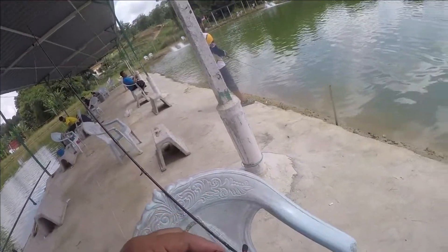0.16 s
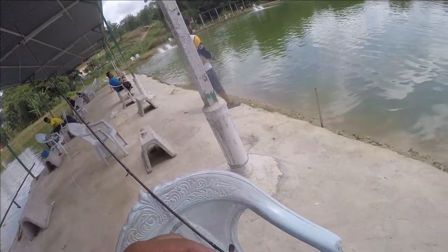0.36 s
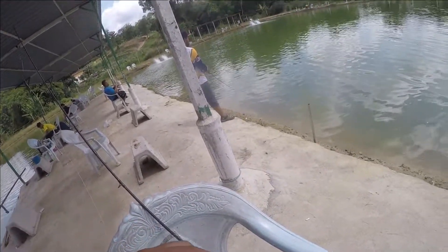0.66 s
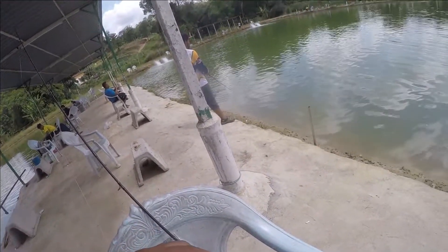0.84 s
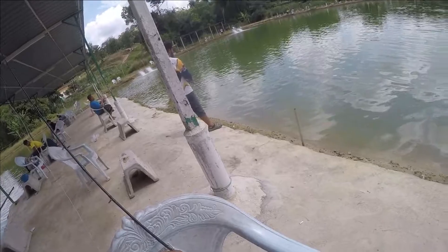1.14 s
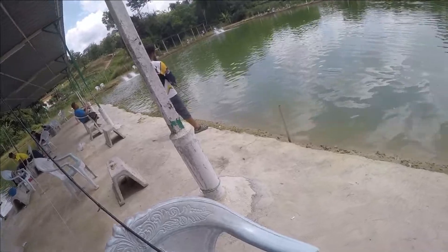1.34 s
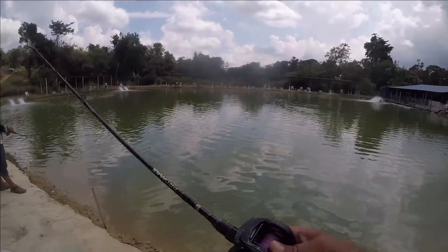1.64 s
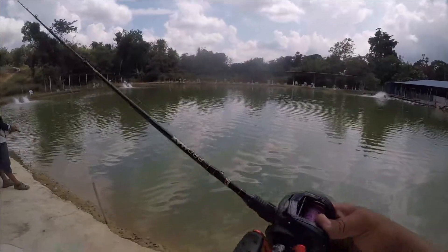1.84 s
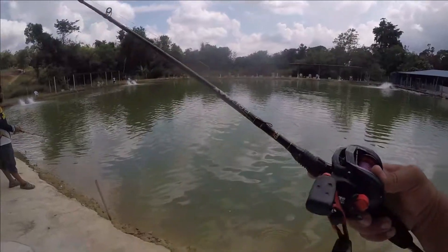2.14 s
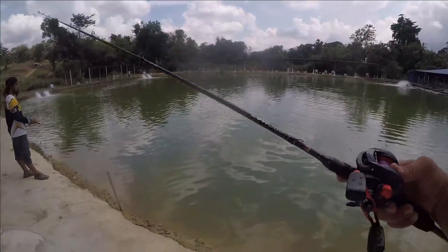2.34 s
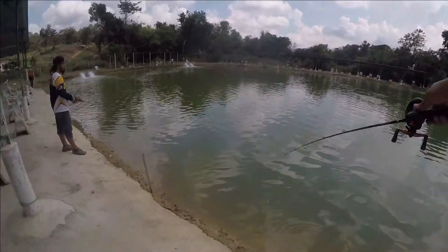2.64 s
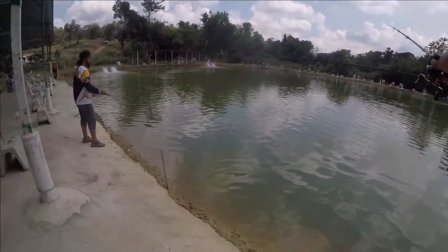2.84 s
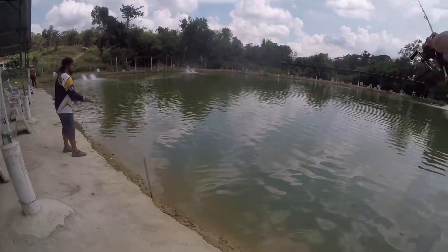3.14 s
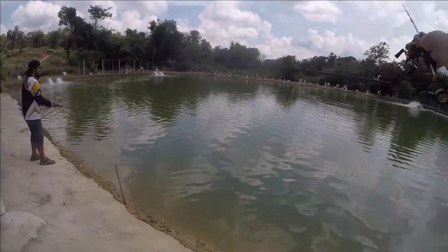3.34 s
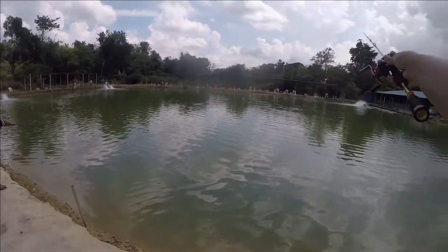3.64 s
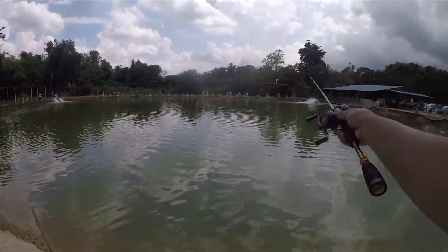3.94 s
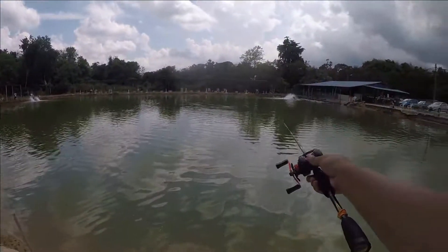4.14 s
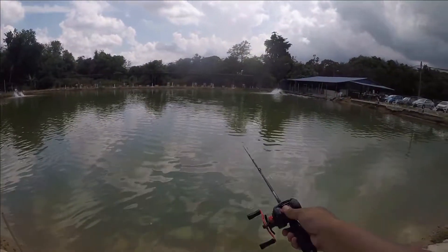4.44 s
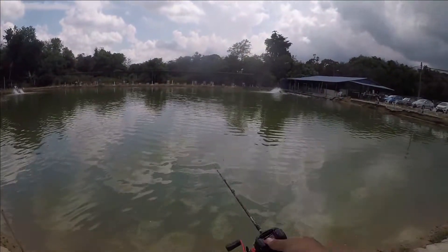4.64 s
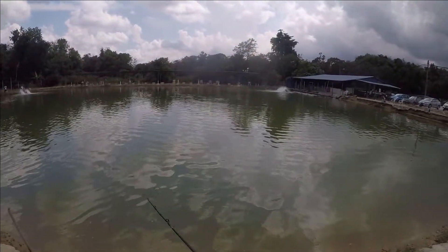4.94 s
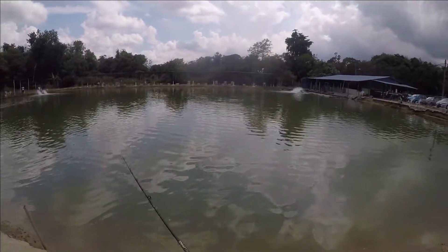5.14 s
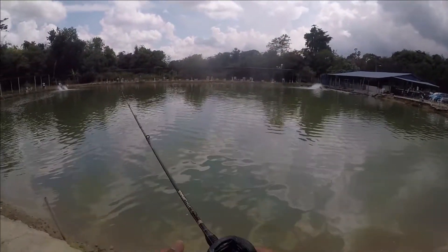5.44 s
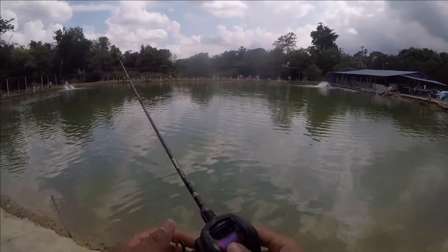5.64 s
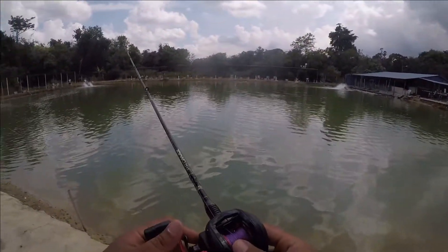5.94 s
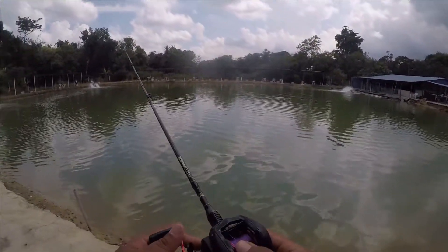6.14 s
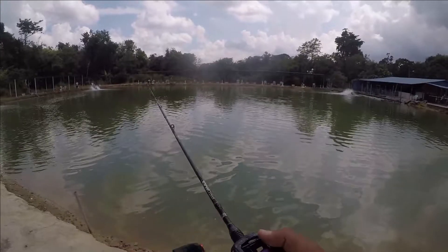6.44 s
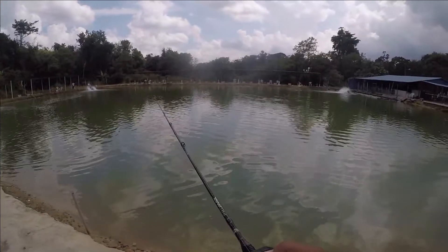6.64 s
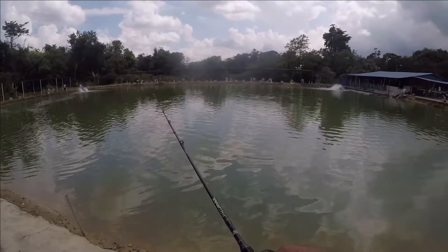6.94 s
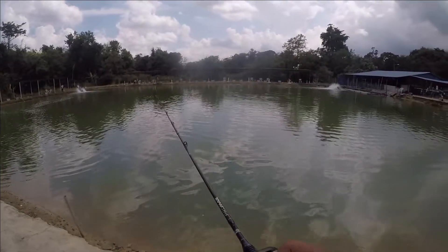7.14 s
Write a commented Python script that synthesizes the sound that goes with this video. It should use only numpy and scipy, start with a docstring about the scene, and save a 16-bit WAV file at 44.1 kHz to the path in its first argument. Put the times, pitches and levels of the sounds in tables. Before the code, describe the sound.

A continuous motor hum and churning water fill the background, with wind buffeting the microphone. After about a second and a half the sound cuts to another spot by the water and the hum drops in pitch. Someone close casts a fishing rod: fabric swish, low knock, bright click, thin fading hiss. Then handling sounds return, with scuffs, soft thumps and a rapid metallic rattle of the reel. Aerators keep droning throughout, slightly unsteady, with a second higher motor joining late.

```python
"""Electric motors drone over churning water: paddlewheel aerators on a pond, heard from two spots in turn.
Motors are sines on orders of a shaft beat; churn, spray, splashes and wind are coloured noise.
A hand casts a rod: cloth noise swells and crackles, clicks ring the reel, line hisses off the spool.
Short low thumps are damped sines; a faint tick marks the change of spot.
Two ports pick up the pond; gain control and soft peaks follow."""
import sys
import numpy as np
from scipy import signal
from scipy.fft import rfft, irfft, next_fast_len
from scipy.io import wavfile

SR = 44100
rng = np.random.default_rng(int(sys.argv[2]) if len(sys.argv) > 2 else 0)


def transcribe(u):
    """Save the signal u as a 16-bit wav file named by the first command-line argument.

    u: samples, shape (n,) or (channels, n), limited to [-1, 1]; the rate is SR.
    q: integer samples, one column per channel.
    """
    v = np.clip(np.atleast_2d(u).T, -1, 1)
    q = np.round(v * 32767).astype(np.int16)
    wavfile.write(sys.argv[1], SR, q)


N = 321489

MOVE_S = 1.428  # the listening spot changes
# faint tick at the change of spot; the corner frequency sets how fast it dies away
TICK_S, TICK_DB, TICK_CORNER_HZ = 1.4262, -17, 250

# main motor, first spot: (time [s], beat [Hz], level [dB])
MAIN_FIRST = [(0, 71.4, -18.5)]
# main motor, second spot: (time [s], level [dB])
MAIN_SECOND = [(1.44, -20.5), (2.0, -20.5), (2.6, -17), (3.1, -20.5), (4.0, -18), (4.7, -18.5),
               (5.8, -21.5), (6.5, -26), (7.0, -21), (7.29, -26)]
# upper orders of the main motor, stronger once the port faces the pond: (time [s], level [dB])
UPPER_SECOND = [(1.44, -64), (3.7, -34), (4.3, -30.5), (4.95, -33.5), (5.4, -31), (7.29, -35.5)]
# beat of the main motor at the second spot, sagging steadily
SECOND_BEAT_HZ, SAG_HZ_PER_S = 57.27, .72
# second motor, at each spot: (time [s], beat [Hz], level [dB])
OTHER_FIRST = [(0, 94.26, -28.5), (.7, 94, -20.5)]
OTHER_SECOND = [(5.5, 92, -51), (5.9, 94, -19), (7.0, 100.5, -23.5), (7.29, 101, -36)]
# shaft orders: (multiple of beat [-], relative level [dB])
ORDERS_FIRST = [(1, -3), (1.75, -12), (2, 0), (2.25, -15), (2.5, -10), (3, -11)]
ORDERS_SECOND = [(1, -1), (2, 0), (3, -4), (4, -17)]
ORDERS_UPPER = [(6, 2), (8, -3), (9, -5), (10, -3)]
ORDERS_OTHER = [(1, 0), (1.2, -2), (2, -8), (2.5, -11), (4, -19)]
# gearbox tones: (frequency [Hz], level [dB])
GEAR_TONES = [(473, -34), (632, -35)]

# cloth and arm events, all with the same slopes: (peak time [s], scuff level [dB], swish level [dB])
RUSTLE = [(2.55, -51, -55), (2.68, -34, -33), (2.75, -36, -37.5), (5.2, -36, -46), (5.44, -54, -56),
          (5.58, -44, -40), (5.68, -36, -36.5), (6.2, -55, -38), (6.55, -48, -45)]
RUSTLE_RISE_DB_PER_S, RUSTLE_FALL_DB_PER_S = 77, 89
# scuff and swish spectra: (frequency [Hz], relative density [dB per Hz])
SCUFF = [(700, -11), (1000, 3), (1500, -2), (2100, -12), (2700, -34)]
CLOTH = [(300, -18), (600, -18), (1000, 13), (1700, 6), (2800, -1), (4500, -14), (8000, -19)]
# snapping folds of cloth: rate, level against the swish
CRACKLES_PER_S, CRACKLE_DB = 300, -14
# line off the spool around the release
HISS_PEAK_S, HISS_DB, HISS_RISE_DB_PER_S, HISS_FALL_DB_PER_S = 2.93, -48, 70, 22
# line hiss spectrum: (frequency [Hz], relative density [dB per Hz])
SPOOL = [(6000, -16), (8000, 12), (10500, -1), (13000, -12), (15300, -20)]
# rod and reel clicks: (time [s], strength [dB], loudest pitch [Hz], fall away from it [dB per octave],
# left minus right [dB])
CLICKS = [(2.732, -20, 2900, 16, -3), (2.9388, -22, 2000, 8, 6), (2.939, -7, 11600, 47, 10),
          (2.9415, -26, 11000, 20, 4), (2.947, -19, 10300, 40, 0), (2.955, -26, 8000, 24, 0),
          (5.43, -17, 1550, 30, 4), (5.886, -33, 9000, 6, 3), (6.0525, -13, 1350, 17, 8),
          (6.058, -8, 2300, 22, 4), (6.0582, -14, 6000, 34, 0), (6.0885, -24, 8000, 30, 2),
          (6.091, -11, 7950, 26, -16), (6.0913, -14, 3360, 12, 6), (6.0941, -7, 1720, 10, 4),
          (6.0955, -22, 8000, 20, 0), (6.098, -9.5, 2700, 2, 7), (6.0981, -11, 8400, 29, -4),
          (6.0996, -4, 4560, 16, -7), (6.111, -30, 5000, 12, 0), (6.5236, -12.5, 3300, 33, 4),
          (6.5236, -19, 1850, 40, 6), (6.529, -25, 3956, 24, 4)]
# reel modes: (frequency [Hz], relative level [dB], t60 [s])
REEL_MODES = [(1250, -8, .014), (1540, -1, .016), (1815, -1, .014), (2335, 0, .012), (2900, -1, .012),
              (3500, -7, .008), (3950, -4, .008), (4540, -2, .008), (5120, -6, .007), (6000, -7, .006),
              (7350, -4, .006), (8100, -3, .007), (9150, -1, .007), (10800, -4, .005), (12000, -6, .004),
              (13500, -9, .003), (15200, -17, .003)]
REEL_SOFT_HZ = 13500  # soft contacts dull the clicks above this
# short low thumps: (time [s], strength [dB], loudest pitch [Hz], fall away from it [dB per octave])
THUMPS = [(1.428, -8, 485, 29), (1.442, -12.5, 486, 30), (2.6981, -0.5, 166, 16), (2.742, -7, 575, 44),
          (4.294, -9.5, 485, 40), (5.43, -12.5, 1150, 27), (6.545, -8, 573, 38), (7.161, -7.5, 485, 45)]
# hollow notes of the thumps: (frequency [Hz], t60 [s], left minus right [dB])
THUMP_NOTES = [(118, 0.079, -4), (191, 0.077, -3.5), (295, 0.079, -8), (485, 0.049, -10), (620, 0.044, -7),
               (1160, .026, 3)]
OPPOSITE_PHASE_HZ = 540  # thump notes above this are in opposite phase on the right

# far water: (time [s], churn level [dB], spray level [dB])
WATER = [(0, -19.5, -47.5), (.75, -18.5, -44.5), (1.4, -19, -46.5), (1.5, -18, -46), (2.6, -17, -45),
         (3.5, -19, -47.5), (4.3, -16.5, -45.5), (5.6, -16, -44.5), (7.15, -17, -46), (7.29, -19, -49)]
# churn, splash and spray spectra: (frequency [Hz], relative density [dB per Hz])
CHURN = [(70, -3.5), (130, -4), (200, -8.5), (300, -8), (400, -7.5), (530, -3), (640, -6), (750, -13),
         (1000, -22), (1300, -29.5), (1700, -35.5), (2400, -38.5), (3500, -43.5), (5000, -50.5)]
SPLASH = [(1000, -8), (1300, -4), (1500, -20.5), (1700, 4), (1900, -12), (2450, -7), (3300, -9),
          (4200, -25)]
SPRAY_FIRST = [(3500, -16), (5500, -7.5), (7300, -1), (8300, -3), (9200, -2), (10200, -8), (12000, -21),
               (13500, -23), (14400, -45)]
SPRAY_SECOND = [(3500, -8), (5500, -5), (7300, 3.5), (8300, -1.5), (9200, -2.5), (10200, -5.5),
                (12000, -15.5), (13500, -23), (14400, -45)]
SPLASH_DB = -31  # against the churn
# rough boom under the roof, first spot: (frequency [Hz], relative density [dB per Hz])
SHELTER = [(60, -11), (100, -8.5), (160, -0.5), (250, -3.5), (320, -10), (700, -34), (1000, -17.5),
           (1300, -41)]
SHELTER_DB = -23

# wind on the ports: (time [s], level [dB])
WIND = [(0, -24), (1.0, -21), (1.75, -18), (2.5, -19), (3.37, -10.5), (3.46, -20), (4.2, -27), (5.0, -17.5),
        (5.9, -20), (6.5, -14), (6.94, -17.5), (7.29, -14.5)]
# single buffets, all with the same slopes: (peak time [s], peak level [dB])
BUFFETS = [(.47, -14), (.89, -16), (4.63, -24), (5.09, -22), (5.52, -12.5), (5.74, -14.5), (7.07, -17)]
BUFFET_RISE_DB_PER_S, BUFFET_FALL_DB_PER_S = 108, 77
# wind spectrum: (frequency [Hz], relative density [dB per Hz])
RUMBLE = [(10, -24), (20, 0), (35, 0), (60, -4.5), (90, -7), (160, -21.5)]

# left port against the right, which booms near 550 Hz:
# (frequency [Hz], left minus right [dB], likeness [0-1], lead [rad])
PORTS = [(70, -1, 1, -.1), (200, -3, .98, -.22), (400, -8, .97, -.22), (500, -14, .78, .1),
         (600, -18, .6, 1.5), (700, -15, .85, 2.2), (1050, -3, .8, 2.15), (1300, 1, .4, 2.3),
         (1600, 2, .45, .3), (2400, 0, .15, 0), (4000, -.5, .85, 0), (5000, 1, 0, 0), (6500, -2, .55, 3.1),
         (9000, -2.5, .45, 2.0), (13000, 0, .3, 1.5)]
CUTOFF_HZ = 16100


def aerators():
    """Motors and gears as the right port hears them: harmonic drones of turning shafts."""
    later = second_spot()
    first = motor(MAIN_FIRST, ORDERS_FIRST, waver_db=1.0)
    first += motor(OTHER_FIRST, ORDERS_OTHER, waver_db=3.0)
    second = motor(sagging(MAIN_SECOND), ORDERS_SECOND, waver_db=1.0)
    second += motor(OTHER_SECOND, ORDERS_OTHER[:1], waver_db=2.0)
    second += motor(sagging(UPPER_SECOND), ORDERS_UPPER, waver_db=1.5)
    gears = sum(motor([(0, hz, db)], ORDERS_OTHER[:1], waver_db=2.5) for hz, db in GEAR_TONES)
    return first * (1 - later) + second * later + gears


def motor(curve, orders, waver_db):
    """Sines on orders of the beat; the air over the pond makes each waver on its own."""
    beat_hz, level_db = in_time(curve)
    unsteady_hz = beat_hz * (1 + 0.00186 * drift(3.03))
    turn_rad = 2 * np.pi * np.cumsum(unsteady_hz) / SR
    lines = np.zeros(N)
    for multiple, order_db in orders:
        gain = from_db(order_db + waver_db * drift(6.5))
        lines += gain * np.sin(multiple * turn_rad + rng.uniform(0, 2 * np.pi))
    return np.sqrt(2) * from_db(level_db) * lines


def sagging(levels):
    """Adds the slowing beat of the second spot to a level curve, held to the end."""
    held = [*levels, (N / SR, levels[-1][1])]
    return [(s, SECOND_BEAT_HZ - SAG_HZ_PER_S * (s - MOVE_S), db) for s, db in held]


def handling():
    """Close sounds of the cast, each reaching both ports directly."""
    return rustle() + line_hiss() + reel()


def rustle():
    """Cloth friction: scuffs in opposite phase at the ports, swishes with crackle; stronger on the left."""
    peak_s, scuff_db, swish_db = np.transpose(RUSTLE)
    slopes = RUSTLE_RISE_DB_PER_S, RUSTLE_FALL_DB_PER_S
    scuff = swells(peak_s, scuff_db, *slopes) * coloured(SCUFF, flicker_db=4.0, rate_hz=35.0)[0]
    scuff = scuff * from_db([[4.0], [-2.0]]) * [[1], [-1]]
    cloth = coloured(CLOTH, flicker_db=2.0, rate_hz=17.0) + from_db(CRACKLE_DB) * crackle()
    swish = swells(peak_s, swish_db, *slopes) * cloth * from_db([[3.0], [-3.0]])
    return scuff + swish


def crackle():
    """Sparse snaps of uneven size in a band around 3 kHz; rms 1."""
    struck = rng.random(N) < CRACKLES_PER_S / SR
    snaps = struck * rng.standard_normal(N) * from_db(1.3 * rng.exponential(1, N))
    band = signal.butter(2, [1900, 4600], "band", fs=SR, output="sos")
    return rms_one(signal.sosfilt(band, snaps + 1e-18))


def line_hiss():
    """Line friction on the spool: flickering noise that swells fast and dies slowly."""
    gain = swells(HISS_PEAK_S, HISS_DB, HISS_RISE_DB_PER_S, HISS_FALL_DB_PER_S)
    return gain * coloured(SPOOL, flicker_db=3, rate_hz=40)


def reel():
    """A click is about a millisecond of chatter striking every mode, most those near its loudest pitch."""
    s, db, top_hz, fall, pan_db = np.transpose(CLICKS)
    at = np.round(s * SR).astype(int)
    steps = np.arange(60)
    out = np.zeros((2, N))
    for k, (hz, level_db, t60_s) in enumerate(REEL_MODES):
        clicks = np.zeros((2, N))
        strength_db = db + level_db - fall * abs(np.log2(hz / top_hz))
        # rows: shared, left only, right only
        chatter = rng.standard_normal((len(at), 3, len(steps))) * np.exp(-steps / 18.0) * 0.055
        chatter[:, 0, 0] = 0.41 * (-1) ** k  # firm first contact
        for side, sign in enumerate((1, -1)):
            gain = from_db(strength_db + sign * pan_db / 2)[:, None]
            clicks[side, at[:, None] + steps] = gain * (chatter[:, 0] + 0.32 * chatter[:, 1 + side])
        out += ring(clicks, hz, t60_s)
    return signal.sosfilt(signal.butter(2, REEL_SOFT_HZ, fs=SR, output="sos"), out)


def thumps():
    """Damped low notes: some from handling, one at the change of spot, others brief lumps in the churn."""
    s, db, top_hz, fall = np.transpose(THUMPS)
    out = np.zeros((2, N))
    for hz, t60_s, pan_db in THUMP_NOTES:
        starts = np.zeros(N)
        # strongest for notes near the loudest pitch
        starts[np.round(s * SR).astype(int)] = from_db(db - fall * abs(np.log2(hz / top_hz)))
        pan = from_db(np.array([[pan_db], [-pan_db]]) / 2)
        out += pan * ring(starts, hz, t60_s) * [[1], [np.sign(OPPOSITE_PHASE_HZ - hz)]]
    return signal.sosfilt(signal.butter(2, 1300, fs=SR, output="sos"), out)


def tick():
    """A faint tick at the change of spot: a downward jump dying away exponentially."""
    pulse = np.zeros(N)
    pulse[round(TICK_S * SR)] = -from_db(TICK_DB)
    return signal.lfilter([1], [1, -np.exp(-2 * np.pi * TICK_CORNER_HZ / SR)], pulse + 1e-18)


def water():
    """Paddles churn a dull roar with surging splashes; the spray hisses brighter at the first spot."""
    churn_db, spray_db = in_time(WATER)
    later = second_spot()
    spray = coloured(SPRAY_FIRST, flicker_db=0.1, rate_hz=15.0) * (1 - later)
    spray += coloured(SPRAY_SECOND, flicker_db=0.8, rate_hz=18.0) * later
    splash = from_db(SPLASH_DB) * coloured(SPLASH, flicker_db=2.0, rate_hz=8.2)
    churn = coloured(CHURN, flicker_db=0.5, rate_hz=64.0)
    return from_db(churn_db) * (churn + splash) + from_db(spray_db) * spray


def shelter_boom():
    """Rough low noise under the roof, at the first spot only."""
    return from_db(SHELTER_DB) * coloured(SHELTER, flicker_db=1.0, rate_hz=12.0) * (1 - second_spot())


def wind():
    """Low turbulent rumble that follows the breeze, with single buffets; powers add."""
    buffets = swells(*np.transpose(BUFFETS), BUFFET_RISE_DB_PER_S, BUFFET_FALL_DB_PER_S)
    gain = np.hypot(from_db(in_time(WIND)[0]), buffets)
    return gain * coloured(RUMBLE, flicker_db=1.5, rate_hz=1.8)


def ports(shared, apart):
    """The right port takes the shared sound; the left a shifted share of it plus unrelated sound."""
    size = next_fast_len(N + SR // 4)
    pad = size - N
    before = pad // 2
    db, alike, lead_rad = at_hz(PORTS, np.arange(size // 2 + 1) * SR / size)
    alike = np.clip(alike, 0, 1)
    padded = np.pad([shared, apart], ((0, 0), (before, pad - before)), mode="reflect", reflect_type="odd")
    shared_bins, apart_bins = rfft(padded)
    share = alike * np.exp(1j * lead_rad) * shared_bins
    left = from_db(db) * (share + np.sqrt(1 - alike ** 2) * apart_bins)
    return np.array([irfft(left, size)[before:before + N], shared])


def second_spot():
    """0 at the first spot, 1 at the second, with a 20 ms cross-fade."""
    return np.clip((np.arange(N) / SR - MOVE_S) / .02 + .5, 0, 1)


def swells(peak_s, peak_db, rise_db_per_s, fall_db_per_s):
    """Gain of events that climb to their peak and sink at steady dB rates; powers add."""
    late_s = np.arange(N) / SR - np.reshape(peak_s, (-1, 1))
    slope_db = np.minimum(rise_db_per_s * late_s, -fall_db_per_s * late_s)
    return np.sqrt(np.sum(from_db(np.reshape(peak_db, (-1, 1)) + slope_db) ** 2, axis=0))


def coloured(spectrum, flicker_db, rate_hz):
    """Two unrelated noises of one colour, silent outside the table, flickering together; rms 1."""
    size = next_fast_len(N)
    hz = np.arange(size // 2 + 1) * SR / size
    inside = (hz > spectrum[0][0]) * (hz < spectrum[-1][0])
    shape = from_db(at_hz(spectrum, hz)[0]) * inside
    noise = irfft(rfft(rng.standard_normal((2, size))) * shape, size)[:, :N]
    return rms_one(noise * from_db(flicker_db * drift(rate_hz)))


def ring(clicks, hz, t60_s):
    """A unit click sets a decaying sine of height 1 ringing."""
    r = from_db(-60 / (max(t60_s, .002) * SR))
    w = 2 * np.pi * hz / SR
    return signal.lfilter([0, np.sin(w)], [1, -2 * r * np.cos(w), r * r], clicks + 1e-18)


def drift(rate_hz):
    """Slow random wander of spread 1: low-passed noise made at SR / 40."""
    r = np.exp(-80 * np.pi * rate_hz / SR)
    noise = rng.standard_normal(N // 40 + 2002)
    slow = signal.lfilter([1], [1, -2 * r, r * r], noise)[2000:]  # skip the settling
    return np.interp(np.arange(N) / 40, np.arange(len(slow)), rms_one(slow))


def in_time(rows):
    """Columns of a time table, sample by sample."""
    s, *columns = np.transpose(rows)
    return [np.interp(np.arange(N) / SR, s, c) for c in columns]


def at_hz(rows, hz):
    """Columns of a frequency table, read on a log axis."""
    f, *columns = np.transpose(rows)
    return [np.interp(np.log(hz + 1), np.log(f), c) for c in columns]


def from_db(db):
    """Decibels to gain."""
    return 10 ** (np.asarray(db) / 20)


def rms_one(x):
    """Scale to unit rms."""
    return x / np.sqrt(np.mean(x ** 2) + 1e-20)


def scene():
    """Far pond and wind through the two ports; handling, thumps and tick are added directly."""
    shared, apart = water() + wind() + shelter_boom()
    return ports(aerators() + shared, apart) + handling() + thumps() + tick()


def record(dry):
    """Gain control evens the level, peaks are rounded, the top is cut."""
    power = signal.lfilter([.0012], [1, -.9988], np.mean(dry ** 2, axis=0))  # smoothed over about 19 ms
    evened = dry * (1 + power / 0.053) ** -.15 * from_db(1.5)
    rounded = 1.188 * np.tanh(evened / 1.248)
    return signal.sosfilt(signal.cheby2(16, 70, CUTOFF_HZ, fs=SR, output="sos"), rounded)


dry = scene()
out = record(dry)
transcribe(out)
```